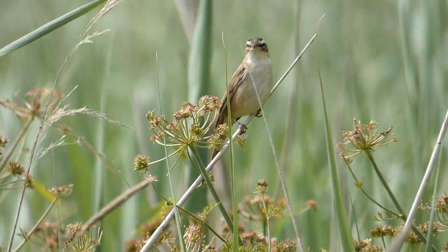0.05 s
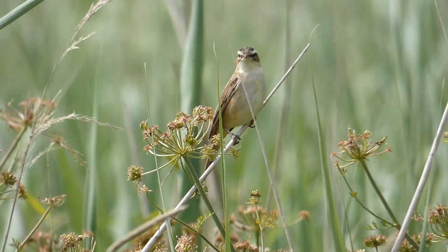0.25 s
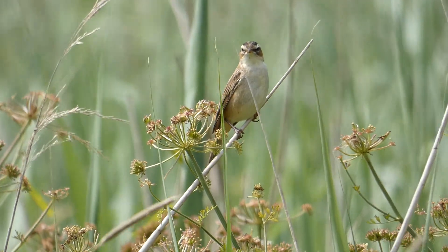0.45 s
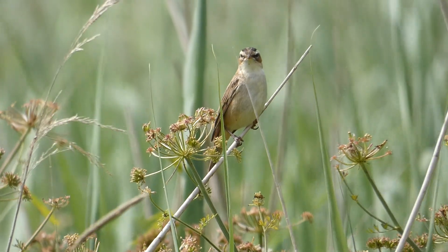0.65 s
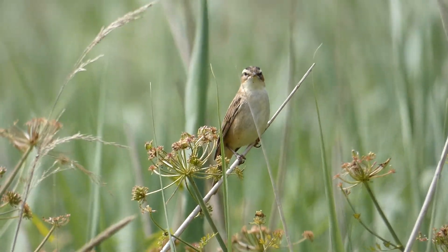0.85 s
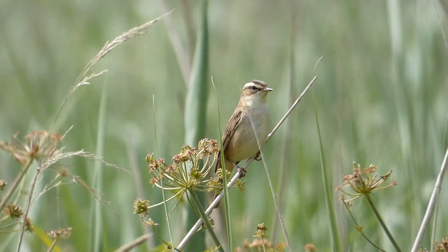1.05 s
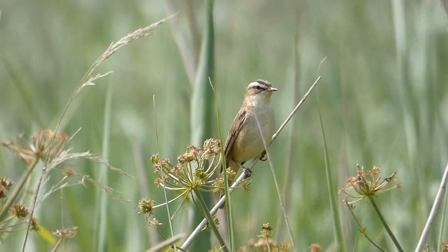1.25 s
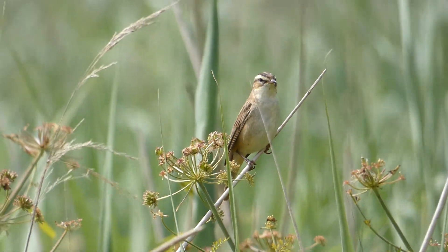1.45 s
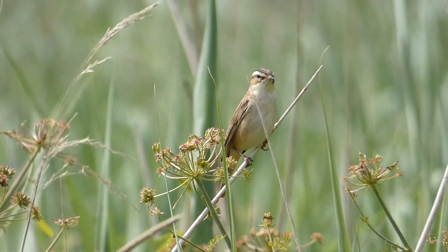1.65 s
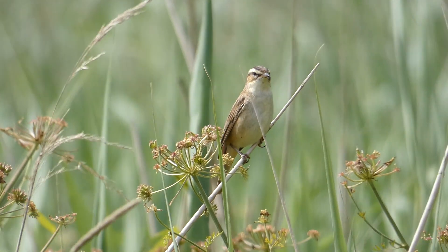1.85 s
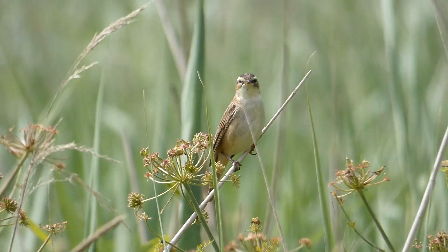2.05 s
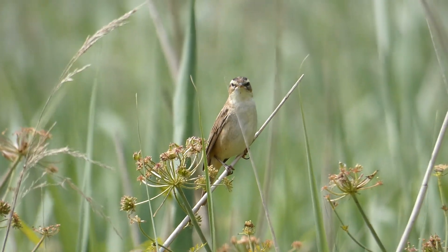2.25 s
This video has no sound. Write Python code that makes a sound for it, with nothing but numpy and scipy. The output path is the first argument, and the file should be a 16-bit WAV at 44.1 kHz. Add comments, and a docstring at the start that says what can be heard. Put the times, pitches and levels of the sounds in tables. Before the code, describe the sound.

Wind buffets the microphone with low thumps from about 0.5 seconds, over a distant hollow rumble and the soft hiss of reeds heard throughout. From about 1.3 seconds come three faint hollow knocks and thin, falling chirps from a small bird on the right, with one dry tick at 1.7 seconds. Near 2 seconds the wind drops and the bird gives its loudest chirps.

```python
"""A reed bed on a breezy day. A hollow, distant rumble and the soft hiss of reeds run throughout.
From 0.5 s gusts buffet the microphone and single eddies thump it. From about 1.3 s three faint hollow
knocks sound and a small bird to the right whistles thin, down-slurred chirps, with one dry tick at 1.7 s.
Near 2 s the wind drops and the bird gives its loudest chirps."""
import sys
import numpy as np
from scipy import signal
from scipy.fft import rfft, irfft
from scipy.io import wavfile
from scipy.ndimage import uniform_filter1d

SR = 44100
rng = np.random.default_rng(int(sys.argv[2]) if len(sys.argv) > 2 else 0)


def log_audio(samples):
    """Write samples as a 16-bit WAV file to the path given in sys.argv[1]."""
    # one column per channel
    frames = np.atleast_2d(samples).T
    # limit to full scale, then quantise
    limited = np.clip(frames, -1, 1)
    pcm = np.round(limited * 32767).astype(np.int16)
    wavfile.write(sys.argv[1], SR, pcm)


N = 105840
TIME = np.arange(N) / SR
SIDE_SIGN = np.array([[1], [-1]])


def from_db(db):
    """Decibels to gain."""
    return 10 ** (np.asarray(db) / 20)


def unit_rms(x):
    """Scale to an rms of one."""
    return x / np.sqrt(np.mean(x ** 2) + 1e-20)


def pan_gains(pan_db):
    """Constant-power left and right gains; positive is left."""
    return unit_rms(from_db(SIDE_SIGN * pan_db / 2))


def drift(rate_hz):
    """Smooth random wander below rate_hz, rms one."""
    hop, settle = 40, 2000
    pole = np.exp(-2 * np.pi * rate_hz * hop / SR)
    white = rng.standard_normal(N // hop + settle + 2)
    slow = signal.lfilter([1], [1, -2 * pole, pole * pole], white)[settle:]
    return np.interp(np.arange(N) / hop, np.arange(len(slow)), unit_rms(slow))


def to_stereo(mid, side, correlation):
    """Mix two independent noises to a given left-right correlation."""
    correlation = np.clip(correlation, -.99, .99)
    return np.sqrt(1 + correlation) * mid + np.sqrt(1 - correlation) * side * SIDE_SIGN


def coloured_noise(spectrum, image=((1000, .85, 0),)):
    """Steady noise, rms one, from spectrum rows (Hz, dB) and image rows (Hz, correlation, L-R dB)."""
    bin_hz = np.maximum(np.arange(N // 2 + 1) * SR / N, 1)
    hz, db = np.transpose(spectrum)
    image_hz, *columns = np.transpose(image)
    correlation, pan_db = [np.interp(np.log(bin_hz), np.log(image_hz), c) for c in columns]
    mid, side = rfft(rng.standard_normal((2, N)))
    noise = to_stereo(mid, side, correlation) * from_db(SIDE_SIGN * pan_db / 2)
    colour = from_db(np.interp(np.log(bin_hz), np.log(hz), db))
    rolloff = np.minimum(bin_hz / hz[0], 1) ** 2 * np.minimum(hz[-1] / bin_hz, 1) ** 2
    return unit_rms(irfft(noise * rolloff * colour, N))


def levelled(x, window_samples=1500):
    """Hold the running rms of a stereo noise near one."""
    return x / np.sqrt(uniform_filter1d(np.mean(x ** 2, axis=0), window_samples) + 1e-12)


# Eddies on the microphone. Each row: start in seconds, peak in dB, final pitch in Hz, cycles to peak.
EDDIES = [(.5125, -25.5, 115, .8), (.719, -23, 130, .45), (.7598, -22, 135, .5), (1.012, -22.5, 135, 1.0),
          (1.141, -21.5, 118, 1.2), (1.2055, -20, 160, .9), (1.545, -25.5, 160, 1.3),
          (1.775, -30.5, 90, .55), (2.192, -37, 140, .5)]


def eddy_thumps():
    """Each eddy hits with a sharp pressure front, then its pitch drops as it broadens."""
    drop_hz, drop_s = 180, .0028
    out = np.zeros(N)
    for start_s, db, hz, rise_cycles in EDDIES:
        age = np.maximum(TIME - start_s, 0)
        cycles = hz * age + drop_hz * drop_s * (1 - np.exp(-age / drop_s))
        rise = np.minimum(hz * age / rise_cycles, 20)
        envelope = (rise * np.exp(1 - rise)) ** 2
        out += from_db(db) * envelope * np.sin(2 * np.pi * cycles)
    return out


# Gust envelope. Each row: time in seconds, deep band in dB, upper band in dB before its trim.
GUST_LEVELS = [(0.0, -51.5, -52), (0.25, -50, -54.5), (0.33, -74, -51.5), (0.4, -39.5, -51),
               (0.47, -54, -49.5), (0.535, -36, -27.5), (0.56, -53, -40), (0.59, -55.5, -54),
               (0.7, -49.5, -49.5), (0.729, -34, -28.5), (0.83, -50, -32.5), (0.96, -51, -38),
               (1.01, -44, -26), (1.16, -42, -30.5), (1.25, -47, -32), (1.33, -66, -36), (1.39, -36, -45),
               (1.44, -56.5, -48), (1.53, -39, -27.5), (1.59, -58, -41.5), (1.64, -38, -37),
               (1.73, -42.5, -50), (1.81, -48, -49), (1.92, -45, -39), (1.96, -62, -53), (2.14, -60.5, -67),
               (2.2, -50, -54), (2.4, -66, -52)]
# Spectra of the two wind bands. Each row: frequency in Hz, relative density in dB.
WIND_DEEP_SPECTRUM = [(25, -20), (40, -8), (55, -18.5), (72, -2), (105, -4), (140, -10), (220, -38)]
WIND_UPPER_SPECTRUM = [(70, -12), (105, -7.5), (140, 0), (240, -7), (320, -16), (450, -28), (800, -24),
                       (2000, -96)]
# Wind stereo image. Each row: frequency in Hz, correlation, L-R in dB.
WIND_STEREO = [(91.5, 0.95, 3.5), (150, 0.59, -2), (292, 0.43, 4)]


def wind():
    """Turbulence on the microphone: two bands follow the gusts, flutter and dip as each eddy passes."""
    flutter_db, upper_trim_db = 1.57, -1.5
    lull_db, lull_s, lull_lag_s = 7, .017, .009
    times_s, deep_db, upper_db = np.transpose(GUST_LEVELS)
    lulls = sum(np.exp(-((TIME - start_s - lull_lag_s) / lull_s) ** 2) for start_s, *_ in EDDIES)
    swing_db = flutter_db * drift(rate_hz=31) - lull_db * lulls
    deep_gain = from_db(np.interp(TIME, times_s, deep_db) + swing_db)
    upper_gain = from_db(np.interp(TIME, times_s, upper_db) + upper_trim_db + swing_db)
    deep = levelled(coloured_noise(WIND_DEEP_SPECTRUM, WIND_STEREO))
    upper = levelled(coloured_noise(WIND_UPPER_SPECTRUM, WIND_STEREO))
    return deep_gain * deep + upper_gain * upper


# Bird notes. Each row: start in seconds, length in seconds, held pitch in Hz, opening pitch offset in Hz,
# sweep time constant in seconds, sag in Hz per second, level in dB before the fade.
BIRD_NOTES = [(1.322, 0.06, 4020, 1200, 0.003, 1800, -60), (1.372, 0.052, 4120, 202, 0.0038, 21000, -61),
              (1.646, 0.042, 5400, 698.5, .004, 7000, -56), (1.9895, 0.07, 5060, 2000, 0.0045, 8300, -47.5),
              (2.2695, 0.04, 5400, 1502.5, 0.005, 7500, -47.5),
              (2.2985, 0.068, 3310, 4000, .0072, 4000, -54.5),
              (2.377, .050, 4030, -1200, 0.005, 500, -56.5)]


def bird_chirps():
    """Pure whistles: a quick sweep onto a held pitch that sags as the note fades."""
    attack_s, release_s, fade_db_per_s, tremor_db = .014, .012, 260, 1.8
    out = np.zeros(N)
    for start_s, length_s, held_hz, sweep_hz, sweep_s, sag_hz_per_s, db in BIRD_NOTES:
        age = np.clip(TIME - start_s, 0, length_s)
        pitch_hz = held_hz + sweep_hz * np.exp(-age / sweep_s) - sag_hz_per_s * age
        whistle = np.sqrt(2) * np.sin(2 * np.pi * np.cumsum(pitch_hz) / SR)
        gate = np.minimum(age / attack_s, 1) * np.minimum((length_s - age) / release_s, 1)
        out += gate * from_db(db - fade_db_per_s * age) * whistle
    return out * from_db(tremor_db * drift(rate_hz=130)) * pan_gains(pan_db=-8.5)


# Spectrum of the bird's tick. Each row: frequency in Hz, relative density in dB.
TICK_SPECTRUM = [(1500, -6), (2400, -2.5), (3300, 3), (4200, 5.5), (4700, 0.5), (5400, -1), (6600, -9),
                 (8000, -22), (14000, -46)]


def bird_tick():
    """A harsh call note: a noise burst a few milliseconds long."""
    start_s, level_db = 1.6725, -44.5
    attack_s, hold_s, t60_s = .003, .004, .033
    age = np.maximum(TIME - start_s, 0)
    decay_db = 60 * np.clip((age - attack_s - hold_s) / t60_s, 0, 2)
    envelope = np.minimum(age / attack_s, 1) * from_db(level_db - decay_db)
    rasp = levelled(coloured_noise(TICK_SPECTRUM), window_samples=130)
    return envelope * rasp * pan_gains(pan_db=2.5)


def stem_scatter(source, level_db=-8, t60_s=.36):
    """Reed stems scatter a sound into a short diffuse tail, different for each ear."""
    age = TIME[:SR // 2]
    tail = rng.standard_normal((2, len(age))) * from_db(-60 * age / t60_s)
    tail /= np.sqrt(np.sum(tail ** 2, axis=1, keepdims=True))
    return from_db(level_db) * signal.fftconvolve(source.mean(axis=0)[None], tail, axes=1)[:, :N]


# Knocks. Each row: start in seconds, length in seconds, pitch in Hz, peak in dB, L-R in dB.
HOLLOW_KNOCKS = [(1.277, .016, 960, -42, 2), (1.6955, .013, 790, -31, -3), (2.285, .012, 780, -37, -4)]


def knocks():
    """Faint hollow knocks: rounded tone blips of about a dozen cycles."""
    out = np.zeros((2, N))
    for start_s, length_s, hz, db, pan_db in HOLLOW_KNOCKS:
        age = np.clip(TIME - start_s, 0, length_s)
        envelope = from_db(db) * np.sin(np.pi * age / length_s) ** 2
        out += envelope * np.sin(2 * np.pi * hz * age) * pan_gains(pan_db)
    return out


# Rumble resonances. Each row: centre in Hz, width in Hz, mean level in dB, L-R in dB, correlation.
RUMBLE_RESONANCES = [(514.5, 23.6, -55, -3.5, 1), (634, 47, -60, 32, 1), (764, 42.6, -51, -9, 0.57),
                     (822, 50, -57.5, -39, 1), (1089, 60, -58.5, 5, 0.78), (1231, 28.4, -62, 2.5, 0.75),
                     (1440, 200, -69, -11, -0.54), (1701, 77, -66, 9.5, 0.56),
                     (1992, 116, -68.5, -17, -0.7), (2069, 49, -70, 19, 0.54), (2333, 120, -67.5, -1, 0.46)]
# Swell and ebb of the rumble. Each row: time in seconds, relative level in dB.
RUMBLE_SWELL = [(0.0, -43.5), (0.11, -52), (0.16, -43), (0.33, -51.5), (0.38, -44.5), (0.55, -48),
                (0.84, -46), (1.09, -45), (1.2, -49), (1.46, -47), (1.9, -46), (2.04, -48.0), (2.4, -47)]
# Spectrum of the rumble's bed. Each row: frequency in Hz, relative density in dB.
RUMBLE_SPECTRUM = [(25, -26), (60, -9), (110, -2.5), (220, -6.5), (420, 0.5), (600, -7), (950, -12),
                   (1280, -14), (1480, -18.5), (2400, -37), (3200, -39.5)]
# Stereo image of the bed. Each row: frequency in Hz, correlation, L-R in dB.
RUMBLE_STEREO = [(120, 0.54, 0.022), (920, 0.51, 0.18), (2400, 0.67, 0)]


def distant_rumble():
    """A broad noise bed with hollow resonances that swell together and waver singly."""
    bed_db, jitter_db, waver_db = -51.5, .55, 2.5
    swell_corner_hz = 980  # higher resonances swell less
    contour_db = np.interp(TIME, *np.transpose(RUMBLE_SWELL))
    swell_db = contour_db - contour_db.mean() + jitter_db * drift(rate_hz=26)
    hollow = np.zeros((2, N))
    for hz, width_hz, db, pan_db, correlation in RUMBLE_RESONANCES:
        band = signal.butter(1, [hz - width_hz / 2, hz + width_hz / 2], "band", fs=SR, output="sos")
        skirt = signal.butter(1, [hz - width_hz * 2, hz + width_hz * 2], "band", fs=SR, output="sos")
        noise = to_stereo(*rng.standard_normal((2, N)), correlation)
        ringing = levelled(signal.sosfilt(np.vstack([band, skirt]), noise), window_samples=4000)
        swell_share = min(1, (swell_corner_hz / hz) ** 2)
        level_db = db + swell_share * swell_db + waver_db * drift(rate_hz=13.1)
        hollow += from_db(level_db) * ringing * pan_gains(pan_db)
    bed = from_db(bed_db + .5 * swell_db) * coloured_noise(RUMBLE_SPECTRUM, RUMBLE_STEREO)
    return hollow + bed


# Spectra of the reeds' hiss and rustle. Each row: frequency in Hz, relative density in dB.
HISS_SPECTRUM = [(800, -7), (2800, 1), (4000, 0.5), (5300, 1), (6500, -2), (8000, -6.5), (9800, -4.5),
                 (12000, -12), (15500, -20)]
RUSTLE_SPECTRUM = [(2500, -9), (6000, -3), (9000, 4), (13000, -7), (15500, -12)]
# Reed stereo image. Each row: frequency in Hz, correlation, L-R in dB.
REED_STEREO = [(5000, 0.77, -1.6), (8850, 0.79, 0.33), (13000, .35, 0)]
# Leaf rustles. Each row: peak time in seconds, half length in seconds, level in dB.
LEAF_RUSTLES = [(0.31, 0.054, -72), (.70, 0.12, -70.5)]


def reeds():
    """Reeds hiss in the breeze, swaying slightly; leaves brush together in soft, brighter rustles."""
    hiss_db, sway_db = -63, .4
    hiss = from_db(hiss_db + sway_db * drift(rate_hz=6.3)) * coloured_noise(HISS_SPECTRUM, REED_STEREO)
    brushing = sum(from_db(db) * np.exp(-((TIME - peak_s) / half_s) ** 2)
                   for peak_s, half_s, db in LEAF_RUSTLES)
    return hiss + brushing * coloured_noise(RUSTLE_SPECTRUM, REED_STEREO)


def scene():
    """Wind on the microphone, the bird among the stems, knocks and the background."""
    bird = bird_chirps() + bird_tick()
    return eddy_thumps() + wind() + bird + knocks() + distant_rumble() + reeds() + stem_scatter(bird)


def record(dry):
    """The microphone's wind filter removes the deepest bass; the top is cut steeply."""
    low_cut_hz, high_cut_hz = 58, 15720
    wind_filter = signal.butter(4, low_cut_hz, "high", fs=SR, output="sos")
    top_filter = signal.ellip(12, .1, 80, high_cut_hz, fs=SR, output="sos")
    return signal.sosfilt(top_filter, signal.sosfilt(wind_filter, dry))


dry = scene()
out = record(dry)
log_audio(out)
```